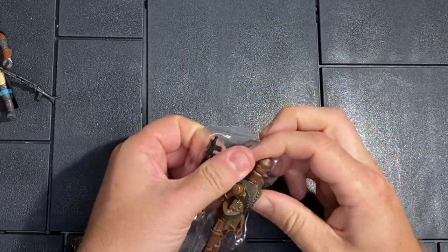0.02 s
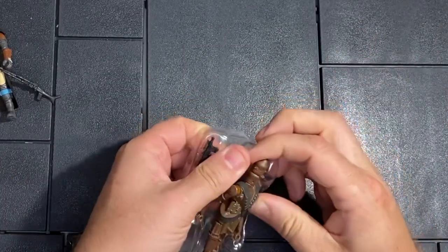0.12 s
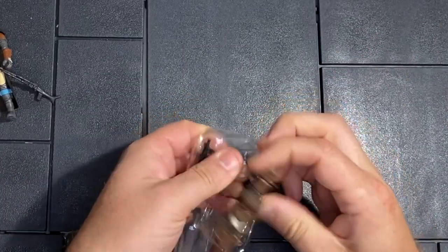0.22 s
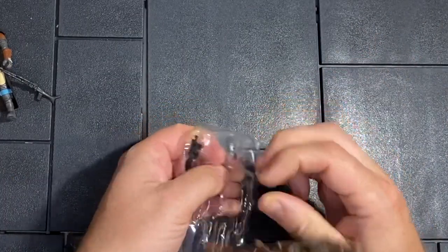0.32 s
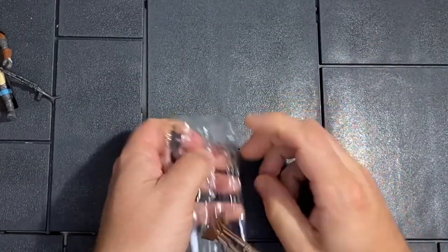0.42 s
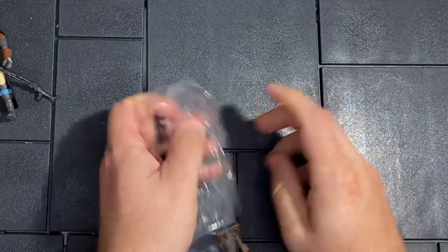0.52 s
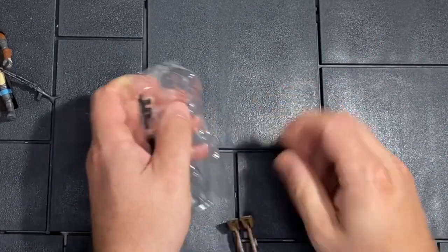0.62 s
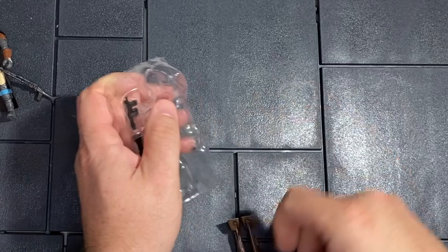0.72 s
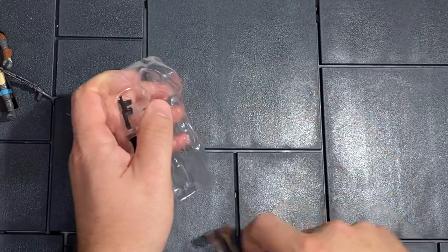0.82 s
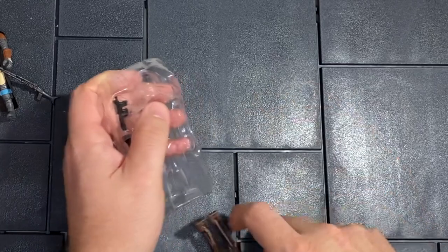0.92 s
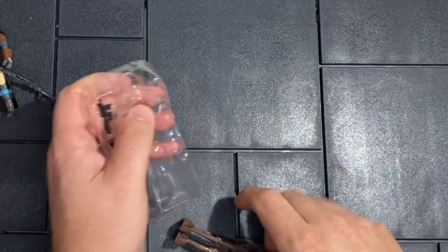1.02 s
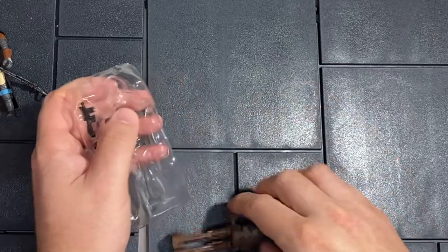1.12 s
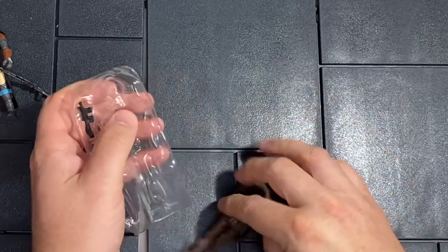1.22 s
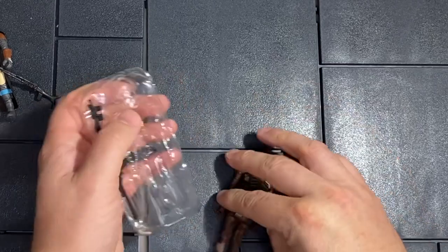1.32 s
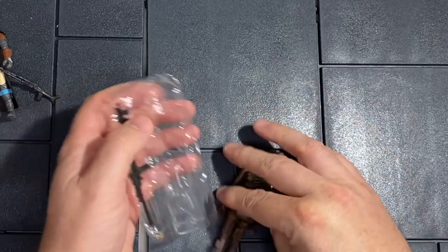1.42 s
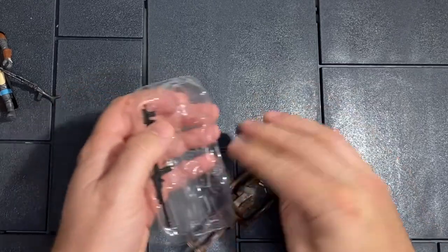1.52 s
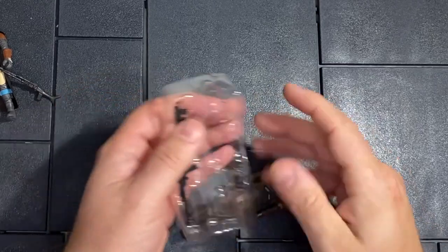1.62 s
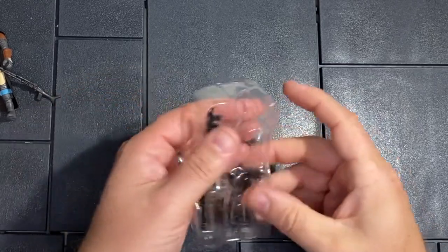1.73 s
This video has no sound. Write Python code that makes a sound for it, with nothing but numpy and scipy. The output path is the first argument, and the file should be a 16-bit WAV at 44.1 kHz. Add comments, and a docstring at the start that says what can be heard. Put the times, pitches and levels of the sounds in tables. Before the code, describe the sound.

Stiff clear plastic packaging crackles in a sharp burst, then a small hard figure drops with a loud clack, bounces and is dragged softly over a table; faint plastic rustle ends it, close stereo microphones, small quiet room.

```python
"""At a padded table top in a small quiet room, hands prise a small figure out of a clear blister shell.
The thin shell buckles, cracks and crinkles: short rough pushes and showers of clicks ring its modes.
The figure drops, bounces and is dragged and nudged across the table, ringing its own and the table's modes.
The table booms and lands dull thuds under the hands; fingers brush the shell and squeeze it again.
Two close microphone ports add a short noise-like room tail and faint hiss; the loudest blows clip."""
import sys
import numpy as np
from scipy import signal
from scipy.fft import rfft, irfft
from scipy.io import wavfile

SR = 44100
rng = np.random.default_rng(int(sys.argv[2]) if len(sys.argv) > 2 else 0)


def to_linear_factor(level_db):
    """Convert decibel levels (scalar or array-like) to linear amplitude factors."""
    exponent = np.asarray(level_db, float) / 20
    return 10 ** exponent


def pcm_store(signal):
    """Save signal as 16-bit PCM."""
    levels = np.round(np.clip(np.atleast_2d(signal), -1, 1) * 32767)
    wavfile.write(sys.argv[1], SR, levels.astype(np.int16).T)


N = 79380

# buckling snaps of the shell, before its low cut: start_s, peak_db, favoured_pitch_hz,
# tilt_db_per_octave, push_decay_s
SNAPS = [(.003, -33, 965, -3, 0.0034), (.025, -35, 2680, -2, 0.00076), (.063, -47.5, 1997, -1, 0.00084),
         (.0886, -13, 2450, -5.5, 0.00039), (.0892, -27.5, 1124, -6.5, 0.0013),
         (.094, -20, 1083, -1, 0.002), (.099, -23.5, 1110, -2, 0.0013), (.116, -29, 940, -3.5, 0.0039),
         (.174, -20, 1260, 0.5, 0.00041), (.183, -19, 1513, 1.5, 0.003), (.192, -19.5, 1870, -3.5, 0.0019),
         (.208, -15.5, 940, -2, 0.0037), (.214, -19.5, 988, -6, 0.0085), (.227, -8.5, 980, 4, 0.0047),
         (.2305, 2, 1211, 2, 0.0031), (.2375, -8, 2650, 2, 0.00098), (.242, -10.5, 1330, 1, 0.0013),
         (.256, -8.5, 1310, 4, 0.0028), (.264, -6, 2400, 6.5, 0.00067), (.266, -0.5, 950, 1.5, 0.0013),
         (.270, -3, 1900, -3, 0.001), (.2735, -5.5, 920, -3.5, 0.00086), (.279, -10.5, 787, -2, 0.0021),
         (.285, -14, 1560, 4.5, 0.002), (.309, -13, 1100, -3.5, 0.00092), (.331, -15.5, 1350, -9, 0.0024),
         (.339, -23.5, 960, -5.5, 0.0054), (.359, -29, 1097, -1.5, 0.0013), (.38, -33.5, 1095, 0.5, 0.0014),
         (.405, -29.5, 3250, -11, 0.0013), (.408, -21, 1060, -4, 0.0011), (.439, -19.5, 860, -1.5, 0.0038),
         (.442, -18.5, 903, -7.5, 0.0019), (.4475, -16.5, 7200, 17.5, 0.00055),
         (.458, -34, 1810, 0.5, 0.0011), (.482, -20.5, 980, -0.5, 0.0012), (.490, -20, 1120, -6, 0.00036),
         (.504, -14, 2310, 1.5, 0.0014), (.511, -24.5, 1009, 5, 0.0029), (1.7325, -36, 1122, -1.5, 0.0037),
         (1.755, -35, 880, -2.5, 0.0014), (1.768, -34, 1910, -0.5, 0.0012), (1.778, -38.5, 4610, 19, .001),
         (1.79, -37, 4500, 6.5, 0.00103)]
# two spells of fine crinkle between the snaps, before a trim: time_s, level_db, tilt_db_per_octave
CRINKLE_SPELLS = [
    [(0.0, -45.5, 4), (0.086, -59, 6), (0.09, -26, -1.5), (0.13, -47.5, 3.5), (0.16, -42.5, 3.5),
     (0.174, -19, -2.5), (0.22, -26.5, 1.5), (0.232, -9, 3), (0.254, -34, 1.5), (0.268, -9.5, 2.5),
     (0.302, -29.5, 5), (0.31, -21, 1.5), (0.398, -49, 4), (0.408, -30, -1), (0.43, -40, 1.5),
     (0.44, -41, 7.5), (0.472, -43, 9), (0.482, -30.5, -2.5), (0.514, -26, 1)],
    [(1.733, -38.5, 2.5), (1.751, -39, 0), (1.767, -38.5, 2.5), (1.8, -41, 2)],
]
# free shell modes, before hand damping: pitch_hz, level_db, t60_s
SHELL_MODES = [(620, -27, 0.032), (839, -12, 0.036), (1020.5, -0.5, 0.034), (1322, -4, 0.035),
               (1713, -6.5, 0.025), (2122, -7.5, 0.044), (2470, -4, 0.02), (3160, -2, 0.013),
               (3800, -12, 0.013), (4420, -6.5, 0.011), (6400, -5.5, 0.00086), (7200, -10.5, 0.0064),
               (9170, -11, 0.0008), (11320, -13, 0.0011), (14040, -27.5, 0.003)]
# fingers brush the shell: time_s, level_db, favoured_pitch_hz
FINGER_RUSTLE = [(1.46, -75.5, 2544), (1.49, -82, 2466), (1.522, -62.5, 2680), (1.56, -84, 2520),
                 (1.584, -79, 2700), (1.598, -59.5, 2660), (1.625, -63.5, 2173), (1.645, -64, 1880),
                 (1.666, -70, 2200), (1.715, -73, 2120)]
# the figure hits the table and rattles: start_s, peak_db, favoured_pitch_hz, tilt_db_per_octave, push_decay_s
FIGURE_KNOCKS = [(.5212, 2.5, 1890, 7.5, 0.00048), (.525, -5.5, 2400, 1.5, 0.0014),
                 (.532, -8, 439, -2.5, 0.0022), (.544, -5, 2180, 3, 0.0018), (.552, -11, 2150, 5.5, 0.0018),
                 (.577, -24.5, 2200, 9, 0.0026), (.631, -22.5, 1450, 4, 0.004),
                 (.636, -26.5, 678, 1, 0.005), (.838, -31.5, 3590, -3, 0.0024),
                 (.854, -19, 1490, 1, 0.00093), (.862, -24, 330, -2, .0015), (.902, -28, 960, 3, 0.0021),
                 (.938, -33, 4255, 10.5, 0.0009), (.945, -27.5, 1700, 4, 0.0013),
                 (1.054, -32.5, 5400, 7.5, .001), (1.066, -38, 5970, 6, .001),
                 (1.077, -16.5, 1740, -2.5, 0.0008), (1.144, -23.5, 1450, -2, 0.0016),
                 (1.2058, -30, 7000, 8.5, 0.0005), (1.2805, -22.5, 2040, -2, 0.00065),
                 (1.333, -39, 260, -9, 0.0082), (1.466, -53, 620, -0.5, 0.0014)]
# flat landings on the hollow under the top: start_s, peak_db, pitch_hz, t60_s (of each of two resonances)
FLAT_LANDINGS = [(.5225, -3.5, 632, 0.025), (.54, -28.5, 62.76, 0.3), (1.224, -32.5, 63.1, 0.17),
                 (1.248, -25.5, 639.5, 0.045)]
# figure modes: pitch_hz, level_db, t60_s
FIGURE_MODES = [(1010, -0.5, 0.06), (1253, -3, 0.042), (1450, -5, 0.015), (1700, 2, 0.0087),
                (2200, -7, 0.028), (2802, -5, 0.014), (3610, -4, 0.0053), (4400, -6, 0.0027),
                (5400, -15.5, 0.0031), (7000, -9, 0.00057), (9400, -35.5, 0.00086), (10900, -27.5, 0.0051),
                (14900, -41, 0.0022)]
# free table top modes: pitch_hz, level_db, t60_s
TABLE_MODES = [(63, -23, 0.91), (112, -32, 0.16), (136.5, -15, 0.15), (216, -19, 0.11), (260, -7, 0.2),
               (343, -5, 0.15), (436.7, -4.5, 0.14), (624.5, -1.5, 0.042), (713, -10, 0.013),
               (760, -8, 0.064)]
# drag across the table: time_s, level_db (before a trim), tilt_db_per_octave, hollow_table_level_db
DRAG_COURSE = [(0.55, -14.5, 3.5, -64), (0.556, -25, 4.5, -34), (0.614, -50, 8, -66), (0.64, -34.5, 1, -48),
               (0.748, -65.5, 5.5, -105), (0.81, -60.5, 5.5, -102.5), (0.82, -65.5, 3.5, -79),
               (0.836, -34, 5, -47), (0.862, -28, -3.5, -41.5), (0.884, -40.5, 2.5, -61),
               (0.944, -33.5, -0.5, -62), (0.982, -52, -3.5, -89), (0.998, -58.5, 5, -49),
               (1.008, -39, 1, -47.5), (1.08, -33.5, 2.5, -42), (1.094, -36.5, -0.5, -46.5),
               (1.138, -30.5, 1, -41), (1.194, -36.5, 0, -40), (1.2, -43, 6.5, -46), (1.23, -37.5, 1, -43),
               (1.256, -35, 1, -35), (1.334, -46, -3.5, -55.5), (1.42, -58, 4, -82.5),
               (1.458, -65.5, -7, -64), (1.468, -55, -4, -62.5), (1.494, -52, 4, -63.5),
               (1.536, -46, 0.5, -60.5), (1.608, -54.5, 5, -71), (1.676, -52.5, 5, -62),
               (1.69, -62, 0, -61), (1.72, -57.5, 4.5, -80)]
# hands and arms shake the table, before a trim: time_s, lowest_mode_level_db, next_three_modes_level_db
TABLE_BOOM = [(0.0, -71.5, -84), (0.024, -66.5, -83), (0.11, -72.5, -62.5), (0.16, -77.5, -82),
              (0.23, -55.5, -44.5), (0.366, -55, -51), (0.38, -61, -64), (0.496, -61, -60),
              (0.525, -61.5, -42), (0.55, -54.5, -27.5), (0.576, -56, -30), (0.6, -50.5, -39),
              (0.63, -53.5, -37), (0.656, -53.5, -31.5), (0.71, -56.5, -49.5), (0.76, -69, -61.5),
              (0.816, -65, -75), (0.846, -56, -36.5), (0.866, -32.5, -39), (1.036, -71, -44.5),
              (1.066, -53, -36), (1.128, -34.5, -54), (1.178, -51, -36), (1.208, -34, -51),
              (1.258, -45.5, -35), (1.278, -31, -54), (1.302, -34.5, -48), (1.338, -48, -31.5),
              (1.388, -61.5, -50.5), (1.418, -49.5, -44.5), (1.448, -49.5, -57), (1.518, -72, -33.5),
              (1.564, -51, -36), (1.594, -49, -49), (1.644, -70, -55), (1.664, -56, -48),
              (1.748, -57, -48.5), (1.8, -61, -82)]
# spectrum shape of the room hiss, before it is set to its level: frequency_hz, density_db_per_hz
AIR_SPECTRUM = [(18, -24), (30, 6), (760, -30.5), (1100, 3), (1250, -34), (1630, -31), (1960, -9),
                (3980, -28.5), (16000, -42)]
# phase by which the left port leads for close sound: frequency_hz, lead_rad
PORT_LEAD = [(0, 0), (2240, 0.3), (3700, 1.9), (4310, 1.2), (6980, -0.0), (7840, 2.7), (8610, 3.3),
             (9820, 0.5), (11800, -0.4), (12700, -3.0), (14300, -3.3), (15100, -6.2), (16300, -5.9),
             (16600, -6.3)]
# left minus right port level for close sound: frequency_hz, difference_db
PORT_BALANCE = [(60, -1.5), (110, -2.0), (200, -2.0), (380, -2.5), (700, -2.5), (1290, -1.0), (2380, -1.0),
                (4400, 1.5), (8120, 0.5), (15000, -0.5)]

CRINKLE_PER_S, DRAG_PER_S = 640, 1400  # mean clicks per second
CRINKLE_SCATTER_DB, DRAG_SCATTER_DB = 6, 4  # spread of click size
DRAG_SMOOTH = 1.6  # steady hiss against clicks of unit rms
FAVOUR_DB, FAVOUR_OCT = 13, 0.24  # lift of the favoured region, its Gaussian width
BEND, PAIR = .045, 1.09  # relative scatter of upper modes, ratio of a mode to its lower twin
UPPER_HZ = 750  # in a strike, modes above this shift and have a twin
RISE_CYCLES = 0.97  # time constant of a push's onset, in cycles of the mode
ROOM_DB, ROOM_T60_S, ROOM_LOW_HZ, ROOM_HIGH_HZ = -9, 0.18, 600, 10300
EARLY_DB, EARLY_S, EARLY_LOW_HZ = 2, 0.0016, 2400  # early reflections: level over the tail, decay, low cut
SHELL_LOW_HZ, MIC_LOW_HZ = 365, 52  # low cuts
CEILING = .98  # clipping amplitude


def curve(table, col):
    """Envelope principle: a table column interpolated linearly over time."""
    a = np.array(table, float)
    return np.interp(np.arange(N) / SR, a[:, 0], a[:, col])


def on_hz(table):
    """Spectral envelope principle: values interpolated over log frequency onto the FFT bins."""
    a = np.array(table, float)
    bins_hz = np.arange(N // 2 + 1) * SR / N
    return np.interp(np.log(bins_hz + 1), np.log(a[:, 0] + 1), a[:, 1])


def span(table, fade_s):
    """Gating: 1 while a table lasts, fading outside it to a floor of -80 dB."""
    t = np.arange(N) / SR
    inside_s = np.minimum(t - table[0][0], table[-1][0] - t)
    return np.clip(inside_s / fade_s + 1, 1e-4, 1)


def highpass(x, hz):
    """Low-frequency rejection by a third-order Butterworth filter."""
    return signal.sosfilt(signal.butter(3, hz, "high", fs=SR, output="sos"), x)


def damped(modes, share):
    """Contact damping: modes held by a hand keep only a share of their ring time."""
    return [(hz, db, t60 * share) for hz, db, t60 in modes]


def twinned(modes):
    """Mode splitting: each mode gains a close lower twin."""
    return modes + [(hz / PAIR, db, t60) for hz, db, t60 in modes]


def favoured(hz, favour_hz):
    """Local excitation: gain in dB, Gaussian in octaves about the favoured pitch."""
    octaves = np.log2(hz / favour_hz)
    return FAVOUR_DB * np.exp(-.5 * (octaves / FAVOUR_OCT) ** 2)


def ring(x, hz, t60):
    """Damped resonance: a two-pole filter in which a unit push rings at about amplitude 1."""
    r = np.exp(-np.log(1000) / (max(t60, .001) * SR))
    w = 2 * np.pi * hz / SR
    return signal.lfilter([0, np.sin(w)], [1, -2 * r * np.cos(w), r * r], x)


def strike(events, modes, spread_db):
    """Modal impact: a short rough push rings all modes, favouring one region and scattering the upper pitches."""
    out = np.zeros(2 * N)
    k = np.arange(600)  # samples of the push
    for s, peak_db, favour_hz, tilt, length in events:
        decay = np.exp(-k / (max(length, .0002) * SR))
        hit = np.zeros(SR // 2)
        for hz, db, t60 in modes:
            upper = hz > UPPER_HZ
            onset = 1 - np.exp(-k * hz / (SR * RISE_CYCLES))
            push = np.zeros(len(k) + int(min(t60, .45) * SR))
            push[:len(k)] = decay * onset * rng.standard_normal(len(k))
            gain_db = db + favoured(hz, favour_hz) + tilt * np.log2(hz / 1000)
            gain_db += spread_db * rng.standard_normal()
            bent_hz = hz * (1 + BEND * rng.standard_normal() * upper)
            tone = ring(push, bent_hz, t60)
            if upper:
                tone = tone + ring(push, bent_hz / PAIR, t60)
            hit[:len(push)] += to_linear_factor(gain_db) * tone
        i = int(s * SR)
        out[i:i + len(hit)] += hit * to_linear_factor(peak_db) / np.abs(hit).max()
    return out[:N]


def rub(level_db, tilt, modes, per_s, scatter_db, smooth, favour_hz=None):
    """Frictional excitation: a random shower of tiny clicks over steady hiss rings the modes."""
    size_db = scatter_db * np.clip(rng.standard_normal(N), -2, 2)
    clicks = (rng.random(N) < per_s / SR) * to_linear_factor(size_db)
    clicks = signal.lfilter([1], [1, -.93], clicks)  # each click dies away
    force = smooth + clicks / np.sqrt(np.mean(clicks ** 2))
    out = np.zeros(N)
    for hz, db, t60 in modes:
        gain_db = level_db + db + tilt * np.log2(hz / 1000)
        if favour_hz is not None:
            gain_db = gain_db + favoured(hz, favour_hz)
        out += ring(to_linear_factor(gain_db) * force * rng.standard_normal(N), hz, t60)
    # longer and louder modes store more energy: level the sum
    weights = [to_linear_factor(db) * np.sqrt(t60) for _, db, t60 in modes]
    return out / np.sqrt(np.sum(np.square(weights)) * SR / 30)


def shell():
    """Buckling of a thin shell: snaps, crinkle and finger rustle ring held modes, radiating no deep bass."""
    out = strike(SNAPS, damped(SHELL_MODES, .7), 2.0)
    for spell in CRINKLE_SPELLS:
        crinkle = rub(curve(spell, 1), curve(spell, 2), damped(SHELL_MODES, 0.27),
                      CRINKLE_PER_S, CRINKLE_SCATTER_DB, 0.92)
        out += to_linear_factor(-12.5) * span(spell, .0015) * crinkle
    brushed = twinned(damped(SHELL_MODES[4:10], 0.614))
    rustle = rub(curve(FINGER_RUSTLE, 1), 0, brushed, DRAG_PER_S, DRAG_SCATTER_DB, 0.47,
                 curve(FINGER_RUSTLE, 2))
    out += span(FINGER_RUSTLE, 0.012) * rustle
    return highpass(out, SHELL_LOW_HZ)


def knocks():
    """Impact of two bodies: each blow rings the figure and all but the three lowest table modes."""
    return strike(FIGURE_KNOCKS, TABLE_MODES[3:] + FIGURE_MODES, 2)


def thuds():
    """Coupled resonance: the top drives the air under it, so the note swells before it dies."""
    out = np.zeros(N)
    for s, peak_db, hz, t60 in FLAT_LANDINGS:
        blow = np.arange(N) == int(s * SR)
        top = ring(blow, hz, t60)
        note = ring(top, hz, t60)
        out += note * to_linear_factor(peak_db) / np.abs(note).max()
    return out


def drag():
    """Sliding friction: contact clicks ring the figure and table, and two hollow table modes apart."""
    body = damped(TABLE_MODES[3:] + FIGURE_MODES, 0.38)
    scrape = rub(curve(DRAG_COURSE, 1), curve(DRAG_COURSE, 2), body,
                 DRAG_PER_S, DRAG_SCATTER_DB, DRAG_SMOOTH)
    hollow = rub(curve(DRAG_COURSE, 3), 0, damped(TABLE_MODES[7:9], 0.82),
                 DRAG_PER_S, DRAG_SCATTER_DB, DRAG_SMOOTH)
    return span(DRAG_COURSE, 0.015) * (to_linear_factor(-9.0) * scrape + hollow)


def boom():
    """Forced plate vibration: hands and arms shake the four lowest table modes while damping them."""
    lowest = rub(curve(TABLE_BOOM, 1), 0, damped(TABLE_MODES[:1], .4), DRAG_PER_S, 0, 0.62)
    next_three = rub(curve(TABLE_BOOM, 2), 0, damped(TABLE_MODES[1:4], 0.58), DRAG_PER_S, 0, 0.45)
    return to_linear_factor(-7.0) * (lowest + next_three)


def unit_energy(x):
    """Energy normalisation: each channel's squares sum to 1."""
    return x / np.sqrt(np.sum(x ** 2, axis=1, keepdims=True))


def room(x):
    """Diffuse reverberation: decaying noise, independent at each port, with bright reflections off hands and table."""
    t = np.arange(SR // 2) / SR
    decay = np.exp(-np.log(1000) * t / ROOM_T60_S)
    onset = np.clip(t / 0.0017 - .5, 0, 1)
    tail = rng.standard_normal((2, len(t))) * decay * onset
    band = signal.butter(1, [ROOM_LOW_HZ, ROOM_HIGH_HZ], "band", fs=SR, output="sos")
    tail = unit_energy(signal.sosfilt(band, tail))
    early = highpass(rng.standard_normal((2, len(t))) * np.exp(-t / EARLY_S), EARLY_LOW_HZ)
    response = tail + to_linear_factor(EARLY_DB) * unit_energy(early)
    return to_linear_factor(ROOM_DB) * signal.fftconvolve(x[None], response, axes=1)[:, :N]


def air():
    """Stationary shaped noise: faint hiss whose side part outweighs its mid part."""
    shape = to_linear_factor(on_hz(AIR_SPECTRUM))
    mid, side = (irfft(rfft(rng.standard_normal(N)) * shape, N) for _ in range(2))
    out = mid + 2.7 * side * np.array([[1], [-1]])
    return out * to_linear_factor(-59) / np.sqrt(np.mean(out ** 2))


def scene():
    """Interaural-style difference: close sound reaches two ports with level and phase set by frequency."""
    near = shell() + knocks() + thuds() + drag() + boom()
    # each port takes half of the difference, in opposite senses
    half = to_linear_factor(on_hz(PORT_BALANCE) / 2) * np.exp(.5j * on_hz(PORT_LEAD))
    spectrum = rfft(near)
    ports = np.array([irfft(spectrum * half, N), irfft(spectrum / half, N)])
    return ports + room(near) + air()


def low_pass(x):
    """Removes everything above the highest recorded frequency."""
    return signal.sosfilt(signal.butter(12, 17020, fs=SR, output="sos"), x)


def record(dry):
    """Amplitude limiting: the microphones cut the deepest bass and the loudest blows clip."""
    mix = np.clip(highpass(dry, MIC_LOW_HZ), -CEILING, CEILING)
    return low_pass(mix)


dry = scene()
out = record(dry)
pcm_store(out)
```